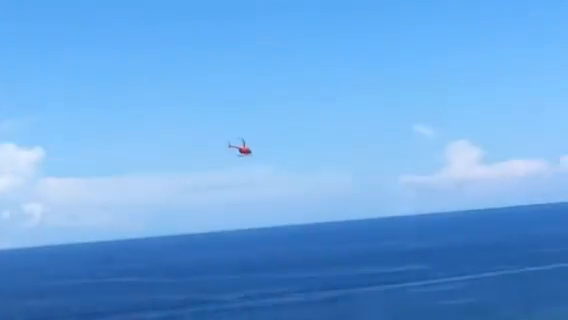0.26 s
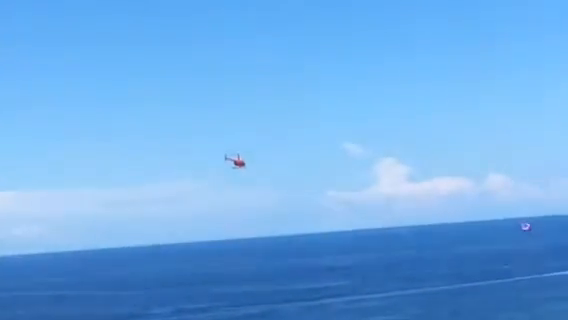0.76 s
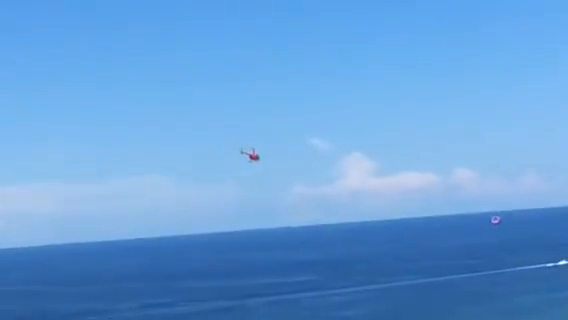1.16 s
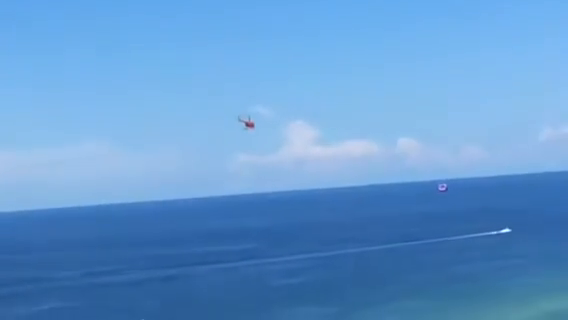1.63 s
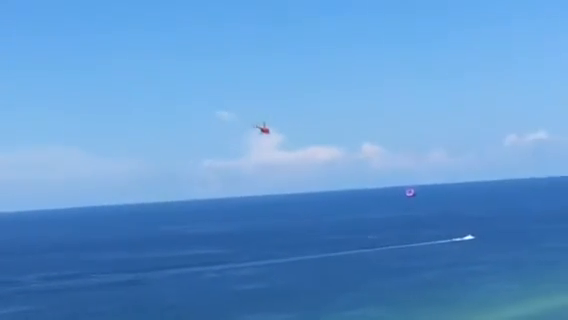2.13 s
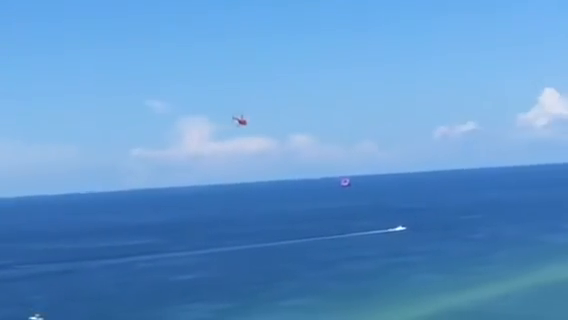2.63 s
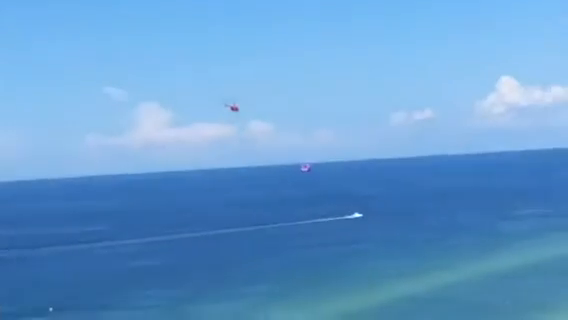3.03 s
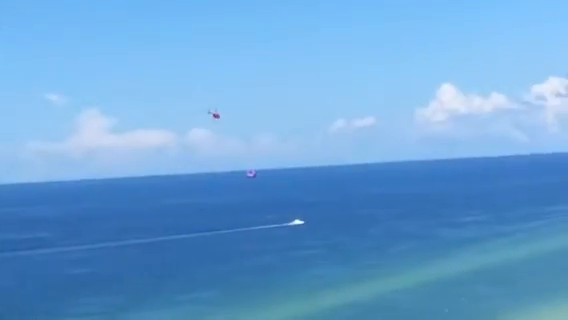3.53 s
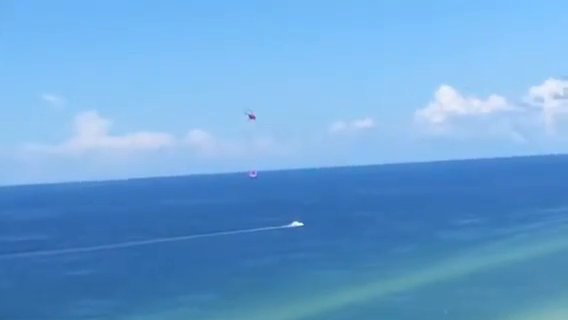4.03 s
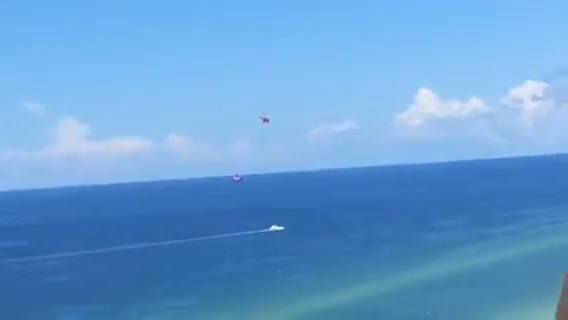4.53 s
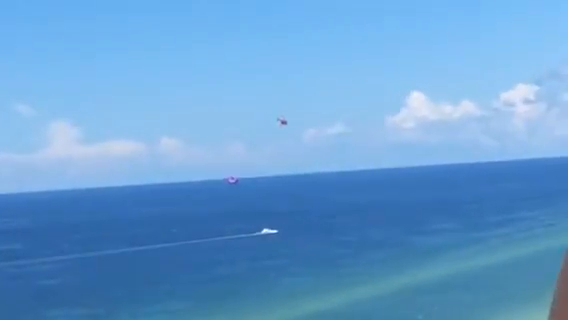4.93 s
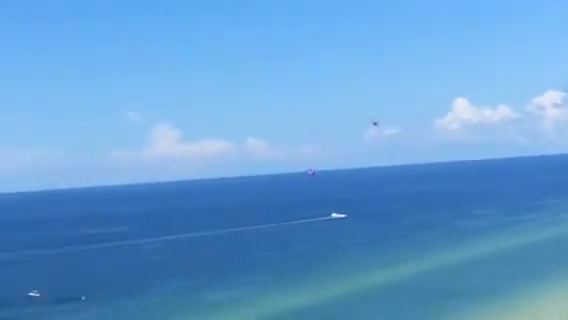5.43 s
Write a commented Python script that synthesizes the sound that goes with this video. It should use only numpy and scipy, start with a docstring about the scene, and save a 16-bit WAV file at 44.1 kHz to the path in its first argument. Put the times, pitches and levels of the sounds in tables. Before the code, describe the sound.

A small piston helicopter flies away over the sea, its steady low engine drone wavering and slowly fading above faint surf and breeze.

```python
"""High above a seashore, a small piston helicopter is heard flying away over the water.
Harmonics of a six-cylinder exhaust drone over tail-rotor buzz and the noise wash of the main blades.
The sea echo closes in on the direct sound; their interference makes the drone swell and fade.
Shaped noise gives surf, breeze and spray below; filtered impulses and noise give the camera's
ticks, tap and rubbing in the hand."""
import sys
import numpy as np
from scipy import signal
from scipy.fft import rfft, irfft, next_fast_len
from scipy.io import wavfile
from scipy.ndimage import uniform_filter1d, map_coordinates

SR = 44100
rng = np.random.default_rng(int(sys.argv[2]) if len(sys.argv) > 2 else 0)


def file_out(sig):
    """Save sig as 16-bit WAV at sys.argv[1]."""
    # one column per channel
    cols = np.atleast_2d(sig).T
    # limit, then scale
    lim = np.clip(cols, -1, 1)
    pcm = np.round(lim * 32767).astype(np.int16)
    wavfile.write(sys.argv[1], SR, pcm)


N = 250480

# exhaust lines: (multiple of camshaft rate, level at the reference distance [dB])
EXHAUST_LINES = [(3, -56.5), (9, -52.5), (10, -56.5), (11, -58.5), (13, -65), (14, -51), (15, -53),
                 (16, -62), (18, -52.5), (19, -56), (20, -51.5), (24, -69), (25, -71), (27, -60), (28, -63),
                 (29, -55.5), (30, -64.5), (32, -62), (34, -65), (40, -66)]
# slow wavering of the firing note, which finally drops away: (time [s], level change [dB])
NOTE_WAVER = [(0, -1), (1.0, 1), (2.0, -0.5), (2.9, 0.5), (3.45, -3), (4.0, -1.5), (5.2, -1.5), (5.68, -28)]
# uneven air makes single exhaust lines flare or sag:
# (time [s], half width [s], multiple of camshaft rate, level change [dB])
LINE_FLARES = [(.8, 0.37, 3, 4.5), (0.26, 0.6, 34, 5), (1.2, .1, 29, 4), (1.28, .1, 14, 4.5),
               (1.3, .08, 18, 8), (1.67, 0.15, 40, 11), (2.02, 0.089, 40, 12), (0.67, 0.14, 12, -1.5),
               (2.16, .2, 12, 2.5), (2.8, 0.17, 12, 2.5), (3.87, .15, 12, 2), (5.7, 0.25, 12, 3.5),
               (5.65, 0.23, 14, 11), (5.225, 0.11, 20, 11.5)]
# tail rotor hum: (multiple of its blade rate, level at the reference distance [dB])
TAIL_LINES = [(1, -55.5), (2, -62), (3, -58)]
# main rotor hum: (multiple of its blade rate, level before MAIN_DB [dB])
MAIN_LINES = [(5, -55), (6, -60.5), (7, -65), (8, -64), (9, -48), (10, -79)]
# noise spectra, each scaled to rms 1 after shaping: (frequency [Hz], relative density [dB per Hz])
GAS_SPECTRUM = [(40, -26), (65, -1), (110, 5.5), (170, 3.2), (330, -3), (450, -5), (640, -2.5), (800, -8),
                (1100, -20.5), (2000, -54), (6000, -88)]  # exhaust gas
WASH_SPECTRUM = [(400, -19), (650, 3.5), (820, 0), (1150, 0.5), (1400, -3), (1600, -7), (2400, -19.5),
                 (4000, -40), (9000, -78)]  # main blade wash
RASP_SPECTRUM = [(900, -30), (1400, -30), (1700, -1), (1880, 6), (2020, 3.5), (2200, 3), (2420, -9),
                 (2800, -17), (4000, -22), (7000, -56), (14000, -80)]  # exhaust rasp near 2 kHz
SURF_SPECTRUM = [(300, -1), (1500, 7), (3000, 3), (3500, 0.5), (5000, -0.5), (6400, -5.5), (7200, -10),
                 (9000, -21.5), (12000, -50)]
FIZZ_SPECTRUM = [(4000, -32), (7300, -14.5), (7900, -1), (8150, 0.5), (9400, 0), (10000, -3.5),
                 (12000, -7.5), (13200, -13), (15000, -19)]  # fine hiss of the shore
SPRAY_SPECTRUM = [(2500, -28), (4200, -5), (5100, 1), (6400, -3.5), (7300, -17), (12000, -37)]
RUMBLE_SPECTRUM = [(20, -17), (40, -8), (52, 1), (64, -2.5), (100, 9), (200, -2), (500, 2.5), (1500, -27.5),
                   (6000, -79)]  # breeze
BODY_SPECTRUM = [(200, -10), (900, -1), (1500, -1), (2100, 7), (2900, -10), (4500, -12), (6000, -15),
                 (7500, -28), (14000, -47)]  # fingertip brushing the camera body
GRIP_SPECTRUM = [(700, -15), (1100, 9), (1350, -5), (1750, -3), (2170, 7), (2500, -13), (3300, -18),
                 (3700, -6), (4200, -8), (4500, -17), (5400, -12), (6100, -30), (14000, -49)]  # finger sliding on the camera body
# gusts and lulls in the roar:
# (time [s], half width [s], gas swell [dB], wash swell [dB], rasp swell [dB])
ROAR_GUSTS = [(.08, 0.16, 0.5, 1.5, 2.5), (.54, 0.023, -6, 3, 5), (.66, 0.074, 0.5, 0, 4),
              (.78, 0.14, 4, 1.5, 1), (1.3, 0.14, 4, -2, 0.5), (1.9, 0.15, 3.5, 3, 4), (2.7, 0.04, 0, 0, 3),
              (3.0, 0.09, -5, -0.5, 0.5), (4.18, .1, 2, 1.5, 2), (4.95, .04, 2.5, 2, 1)]
# ebb and return of the shore: (time [s], surf level [dB], fine hiss level [dB])
SHORE_LEVELS = [(0, -55, -70), (.5, -53.5, -68.5), (1.3, -54.5, -68.5), (1.7, -56, -71), (3.8, -60.5, -72),
                (4.5, -57.5, -69), (5.68, -56, -69)]
# swells of spray in the surf: (time [s], half width [s], peak level [dB])
SPRAY_SWELLS = [(.45, 0.33, -63), (1.9, 0.092, -65)]
# handling ticks: (time [s], impulse level before colouring [dB])
HANDLING_TICKS = [(0.341, -30), (0.6876, -26.5), (1.4147, -38), (3.5702, -28)]
# colouring of handling impulses: (frequency [Hz], gain [dB])
TICK_RESPONSE = [(300, -20), (3000, -16), (7600, -12), (9000, 0), (10500, -10), (13000, -16), (15000, -26)]
TAP_RESPONSE = [(300, 10), (1000, 13), (2000, 19.5), (3200, 13), (4400, 11.5), (6000, 2), (8000, -6),
                (10800, 0), (14000, 0), (15000, -4)]

# straight, level, steady flight, already past its nearest point; heights are above the sea
SPEED_M_PER_S, ABEAM_M, NEAREST_S = 13.837, 50.44, -1.053
HEIGHT_M, MICROPHONE_HEIGHT_M = 40.726, 20.576
FIRING_HZ, SOUND_M_PER_S = 125.3, 343  # firing rate at the engine; speed of sound
REFERENCE_M = 69  # distance at which no fade applies
CYLINDERS = 6
TAIL_GEAR, MAIN_GEAR = 3.55, 0.595  # blade passes per camshaft turn

# layer levels at the reference distance [dB] and losses per doubling of distance [dB]
NOTE_DB, NOTE_LOSS_DB = -30.5, 6.5
OCTAVE_DB, OCTAVE_LOSS_DB = -46, 7
GAS_DB, GAS_LOSS_DB = -46, 7
WASH_DB, WASH_LOSS_DB = -50, 5.5
RASP_DB, RASP_LOSS_DB = -54.5, 9
MAIN_DB, MAIN_LOSS_DB = -8, 6  # gain on the whole main-rotor table
TAIL_LOSS_DB = 9
# exhaust lines: loss, with extra loss per camshaft order above LINE_EDGE
LINE_LOSS_DB, LINE_STEEP_DB, LINE_EDGE = 3, 1.35, 24
# sea echo share; flutter and phase drift [rad] per multiple of the firing note
LINE_ECHO, LINE_FLUTTER_DB, LINE_DRIFT = 0.62, 0.35, 0.045
ECHO_EDGE = 21  # above this camshaft order the ripples scatter the echo
FOLLOW_SHARE = 0.17  # share of the firing note's wavering (in dB) followed by other exhaust sound
RASP_FLUTTER_DB = 0.9
EDGE_BELOW_M, EDGE_ECHO = 0.8, 0.28  # hard edge under the microphone; share it scatters

BREEZE_S, BREEZE_WIDTH_S, BREEZE_DB = 0.96, 0.3, 4.5  # a puff of breeze lifts the rumble
TAP_S, TAP_DB = 5.1891, -31.5  # finger tap, level before colouring
BRUSH_S, BRUSH_WIDTH_S, BRUSH_DB = 5.199, 0.016, -51  # fingertip brush around the tap
STROKE_S, STROKE_WIDTH_S, STROKE_DB = 5.555, 0.07, -53  # sliding finger
TOP_HZ = 15300  # upper frequency limit of the whole sound


def amp(db):
    """Logarithmic level: decibels to amplitude gain."""
    return 10 ** (np.asarray(db) / 20)


def unit(x):
    """Power normalisation: scale to rms 1."""
    return x / np.sqrt(np.mean(x ** 2) + 1e-20)


def curves(rows):
    """Linear interpolation: one value per sample for each column after the time."""
    s, *columns = np.transpose(rows)
    return [np.interp(np.arange(N) / SR, s, column) for column in columns]


def wobble(rate):
    """Band-limited fluctuation: a smooth random curve with rate knots per second."""
    knots = rng.standard_normal(int(N * rate / SR) + 4)
    return map_coordinates(knots, [np.arange(N) * rate / SR])


def swell(s, width_s):
    """Gaussian envelope: a smooth rise and fall of height 1 around time s."""
    return np.exp(-((np.arange(N) / SR - s) / width_s) ** 2)


def filtered(x, response):
    """Linear filtering: multiply the spectrum by a response of frequency."""
    m = next_fast_len(N + 8192)
    return irfft(rfft(x, m) * response(np.fft.rfftfreq(m, 1 / SR)), m)[:N]


def coloured(x, spectrum):
    """Spectral shaping: gains joined linearly in dB on a log frequency axis."""
    f, db = np.transpose(spectrum)
    return filtered(x, lambda hz: amp(np.interp(np.log(hz + 1), np.log(f), db)))


def rush(spectrum, patchy_db):
    """Turbulence noise: rms 1, with patches of gain across time and frequency."""
    z = signal.stft(rng.standard_normal(N), nperseg=1024)[2]
    field = uniform_filter1d(rng.standard_normal(z.shape), size=6, axis=0)  # smooth in frequency
    field = uniform_filter1d(field, size=14, axis=1)  # smooth in time
    patchy = signal.istft(z * amp(patchy_db * unit(field)), nperseg=1024)[1][:N]
    return unit(coloured(patchy, spectrum))


def ranges():
    """Image source: metres to the helicopter and to its mirror image in the sea."""
    ground = np.hypot(ABEAM_M, SPEED_M_PER_S * (np.arange(N) / SR - NEAREST_S))
    direct = np.hypot(ground, HEIGHT_M - MICROPHONE_HEIGHT_M)
    mirrored = np.hypot(ground, HEIGHT_M + MICROPHONE_HEIGHT_M)
    return direct, mirrored


def camshaft():
    """Doppler effect: growing delay on both paths lowers the pitch of the arriving camshaft turns."""
    seconds = np.arange(N) / SR
    return [FIRING_HZ / CYLINDERS * (seconds - metres / SOUND_M_PER_S) for metres in ranges()]


def fade(loss_db):
    """Spreading and absorption: a gain losing loss_db with each doubling of distance."""
    return amp(-loss_db * np.log2(ranges()[0] / REFERENCE_M))


def line(order, paths, echo, flutter_db, drift):
    """Two-path interference: turbulence shakes each path's level and their common phase."""
    phase = rng.uniform(0, 2 * np.pi) + drift * wobble(7)
    direct, mirrored = [
        amp(flutter_db * wobble(9)) * np.sin(2 * np.pi * order * turns + phase) for turns in paths]
    return unit(direct + echo * mirrored)


def flare(order):
    """Propagation through uneven air: the gain of one exhaust line flares or sags."""
    return amp(sum(db * swell(s, width_s)
                   for s, width_s, which, db in LINE_FLARES if abs(which - order) < 0.5))


def waver():
    """Common modulation: other exhaust sound follows part of the firing note's rise and fall."""
    return amp(FOLLOW_SHARE * curves(NOTE_WAVER)[0])


def exhaust(paths):
    """Fourier series of the engine cycle: firing note, octave, and orders from unequal cylinders."""
    direct, mirrored = ranges()
    # the note's echo grows stronger as the two paths even out
    note = line(CYLINDERS, paths, echo=(direct / mirrored) ** 0.72, flutter_db=1.0, drift=0.0089)
    out = amp(NOTE_DB + curves(NOTE_WAVER)[0]) * fade(NOTE_LOSS_DB) * note

    octave = line(2 * CYLINDERS, paths, echo=0.71, flutter_db=0.45, drift=0.043)
    out += amp(OCTAVE_DB) * fade(OCTAVE_LOSS_DB) * flare(2 * CYLINDERS) * octave

    for order, db in EXHAUST_LINES:
        height = order / CYLINDERS  # multiple of the firing note
        loss_db = LINE_LOSS_DB + LINE_STEEP_DB * max(order - LINE_EDGE, 0)
        gain = amp(db) * fade(loss_db) * flare(order) * waver()
        echo = LINE_ECHO * min(1, (ECHO_EDGE / order) ** 2)
        out += gain * line(order, paths, echo, LINE_FLUTTER_DB * height, LINE_DRIFT * height)
    return out


def rotors(paths):
    """Blade-passing harmonics: tail and main rotor hum at rates geared to the engine."""
    tail = sum(amp(db) * line(k * TAIL_GEAR, paths, echo=0.19, flutter_db=2.0, drift=0.3)
               for k, db in TAIL_LINES)
    main = sum(amp(db) * line(k * MAIN_GEAR, paths, echo=0.92, flutter_db=0.5, drift=1.0)
               for k, db in MAIN_LINES)
    return fade(TAIL_LOSS_DB) * tail + amp(MAIN_DB) * fade(MAIN_LOSS_DB) * main


def puffs(turns, sharpness, uneven):
    """Pulsating flow: one gas puff per firing, unequal around the camshaft turn."""
    angle = 2 * np.pi * turns
    pattern = np.cos(2 * angle) + np.cos(3 * angle) + np.cos(4 * angle)
    return unit(np.exp(sharpness * np.cos(CYLINDERS * angle) + uneven * pattern))


def over_sea(x, echo):
    """Comb filtering: noise plus its sea echo, the comb sliding upward as the lag shrinks."""
    direct, mirrored = ranges()
    n = np.arange(N)
    lag = SR * (mirrored - direct) / SOUND_M_PER_S  # samples
    return unit(x + echo * np.interp(n - lag, n, x, period=N))


def roar(paths):
    """Amplitude-modulated flow noise: gas and rasp pulse with firing, wash also with each main blade."""
    turns = paths[0]
    gusts_db = sum(np.outer(db, swell(s, width_s)) for s, width_s, *db in ROAR_GUSTS)
    gas_db, wash_db, rasp_db = gusts_db + 0.16 * wobble(9)
    swish = amp(0.33 * np.cos(2 * np.pi * MAIN_GEAR * turns))

    gas = over_sea(rush(GAS_SPECTRUM, patchy_db=1.5), echo=0.32)
    gas = gas * puffs(turns, sharpness=0.2, uneven=0.13)
    wash = over_sea(rush(WASH_SPECTRUM, patchy_db=1.55), echo=0.44)
    wash = wash * swish * puffs(turns, sharpness=0.13, uneven=0.066)
    rasp = rush(RASP_SPECTRUM, patchy_db=1.8) * puffs(turns, sharpness=0.19, uneven=0.095)
    rasp = rasp * amp(RASP_FLUTTER_DB * wobble(14))

    return (amp(GAS_DB + gas_db) * fade(GAS_LOSS_DB) * waver() * gas
            + amp(WASH_DB + wash_db) * fade(WASH_LOSS_DB) * wash
            + amp(RASP_DB + rasp_db) * fade(RASP_LOSS_DB) * rasp)


def past_edge(x):
    """Edge diffraction: an inverted echo whose comb sweeps upward as the elevation angle falls."""
    sine_elevation = (HEIGHT_M - MICROPHONE_HEIGHT_M) / ranges()[0]
    lag_s = 2 * EDGE_BELOW_M * sine_elevation / SOUND_M_PER_S
    n = np.arange(N)
    return x - EDGE_ECHO * np.interp(n - SR * lag_s, n, x)


def shore():
    """Broadband turbulence noise: surf and fine hiss ebb and return over breeze rumble and spray."""
    surf_db, fizz_db = curves(SHORE_LEVELS)
    surf = amp(surf_db + 0.17 * wobble(8)) * rush(SURF_SPECTRUM, patchy_db=1.48)
    fizz = amp(fizz_db) * rush(FIZZ_SPECTRUM, patchy_db=1.8)
    spray_gain = sum(amp(db) * swell(s, width_s) for s, width_s, db in SPRAY_SWELLS)
    spray = spray_gain * rush(SPRAY_SPECTRUM, patchy_db=3.5)
    breeze_db = -48.5 + BREEZE_DB * swell(BREEZE_S, BREEZE_WIDTH_S) + 0.44 * wobble(6.3)
    rumble = amp(breeze_db) * rush(RUMBLE_SPECTRUM, patchy_db=0.5)
    return surf + fizz + spray + rumble


def click(s, db):
    """Impulse excitation: a single nonzero sample at time s."""
    return amp(db) * (np.arange(N) == round(s * SR))


def hand():
    """Impact and friction: coloured impulses tick and tap the casing, noise brushes and slides on it."""
    ticks = coloured(sum(click(s, db) for s, db in HANDLING_TICKS), TICK_RESPONSE)
    tap = coloured(click(TAP_S, TAP_DB), TAP_RESPONSE)
    brush = amp(BRUSH_DB) * swell(BRUSH_S, BRUSH_WIDTH_S) * rush(BODY_SPECTRUM, patchy_db=1.2)
    slide = amp(STROKE_DB) * swell(STROKE_S, STROKE_WIDTH_S) * rush(GRIP_SPECTRUM, patchy_db=3.0)
    return ticks + tap + brush + slide


def scene():
    """Superposition: helicopter, shore and hand add at one microphone."""
    paths = camshaft()
    helicopter = exhaust(paths) + rotors(paths) + past_edge(roar(paths))
    return (helicopter + shore() + hand())[None]


def record(dry):
    """Band limitation: the sound holds nothing at or above TOP_HZ."""
    return filtered(dry[0], lambda hz: hz < TOP_HZ)[None]


dry = scene()
out = record(dry)
file_out(out)
```